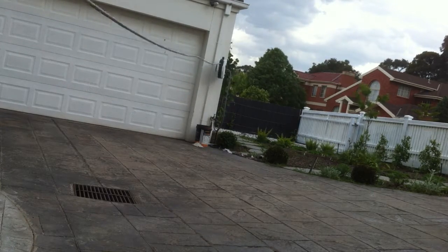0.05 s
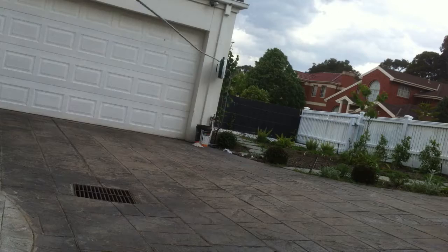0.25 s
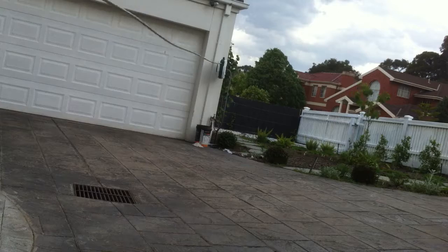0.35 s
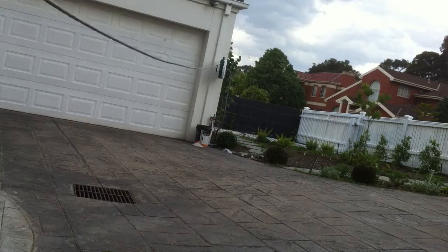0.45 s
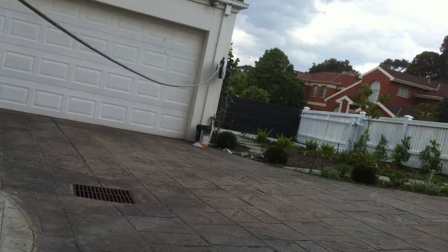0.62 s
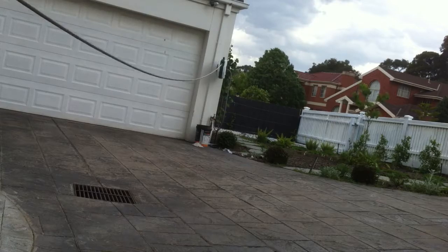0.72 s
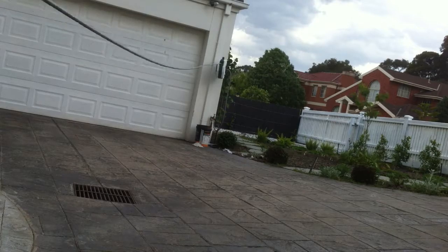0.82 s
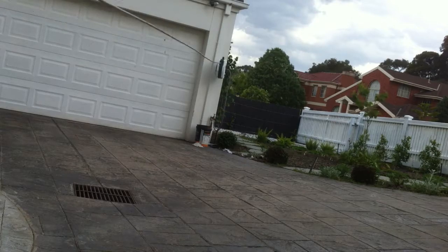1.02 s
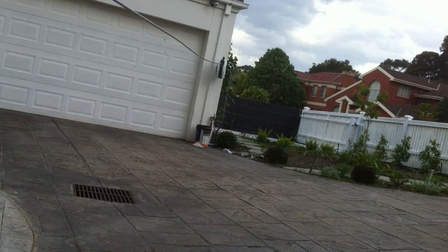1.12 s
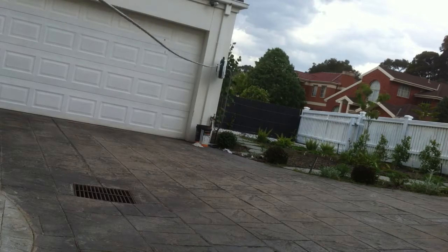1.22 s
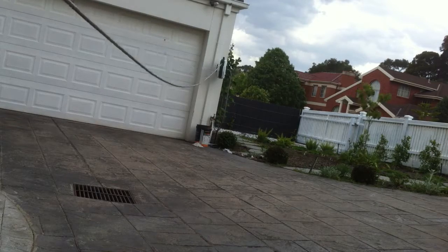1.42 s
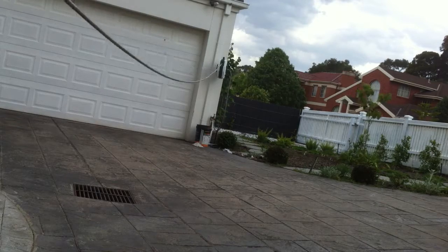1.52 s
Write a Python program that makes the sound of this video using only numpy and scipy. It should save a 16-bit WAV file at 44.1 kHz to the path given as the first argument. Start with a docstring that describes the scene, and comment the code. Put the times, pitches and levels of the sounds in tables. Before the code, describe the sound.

A hose reel clicks six times, unevenly, between about 0.2 and 0.8 seconds, each a sharp plastic snap with a short outdoor echo. Close, dull handling knocks and rubbing on the microphone are loudest from 0.2 to 0.5 seconds, along with a low wind rumble, then thin out by 1.2 seconds. A very faint, distant chirp comes at 1.2 seconds, and a quiet outdoor hush lasts to 1.5 seconds.

```python
"""A suburban driveway by a garage. A hose reel turns slowly and its catch clicks six times: each snap
rings the plastic housing, and a wall slaps it back just as the yard's diffuse tail sets in.
Up close, dull handling knocks set the camera body swinging while the grip rubs.
Underneath sit a little wind rumble and a steady outdoor hush, with one faint far chirp near the end."""
import sys
import numpy as np
from scipy import signal
from scipy.fft import rfft, irfft
from scipy.io import wavfile
from scipy.ndimage import uniform_filter1d

SR = 44100
rng = np.random.default_rng(int(sys.argv[2]) if len(sys.argv) > 2 else 0)


def file_out(sig):
    """Save sig as 16-bit WAV at sys.argv[1]."""
    # one column per channel
    cols = np.atleast_2d(sig).T
    # limit, then scale
    lim = np.clip(cols, -1, 1)
    pcm = np.round(lim * 32767).astype(np.int16)
    wavfile.write(sys.argv[1], SR, pcm)


N = 68355

# fader ride of the wind and handling rumble (time [s], level [dB])
RUMBLE_RIDE = [(0, -47), (.05, -55), (.11, -50.5), (.2, -51), (.3, -38.5), (.42, -41.5), (.49, -29.5),
               (.56, -48.5), (.66, -49.5), (.74, -52.5), (.86, -44.5), (.93, -52.5), (1.08, -54),
               (1.18, -54.5), (1.26, -62), (1.55, -61)]
# tone of that rumble (frequency [Hz], relative level [dB])
RUMBLE_SPECTRUM = [(20, -30), (45, -38.5), (80, -2), (140, 1.5), (240, -2), (400, -20), (700, -25),
                   (1500, -34.5), (16000, -79)]
# tone of the outdoor hush (frequency [Hz], relative level [dB])
HUSH_SPECTRUM = [(30, -7), (60, -20), (120, -12.5), (220, 1), (400, -6), (700, -3.5), (1200, -4),
                 (2000, -11.5), (2900, -16), (4000, -19), (8000, -25.5), (16000, -31)]
# bumps on the camera body, before EQ (time [s], strength [dB], pitch [Hz], decay time [s])
BODY_KNOCKS = [(.003, -27, 140, 0.0032), (.018, -25.5, 145, 0.0081), (0.0315, -23.5, 140, 0.0039),
               (0.1189, -20, 136, 0.0092), (0.1478, -24.5, 134, 0.0089), (.22, -13, 220, .006),
               (.2252, -20, 130, .006), (.2392, -6, 158, .0071), (.2511, -34, 406, .006),
               (.2601, -14.5, 147, .035), (.2719, -36, 429, .007), (.2766, -14, 145, .022),
               (.2948, -1, 211, .0021), (.3075, -34, 195, .05), (.3389, -31, 432, .0038),
               (.3396, -20, 191, .0143), (.3558, -13, 275, .0036), (.3849, -34, 245, .045),
               (.4217, -10, 189, .0049), (.4295, -28, 364, .006), (.4362, -9, 153, .0079),
               (.4425, -30, 620, .0033), (.4664, -21, 470, .008), (.4677, -13, 182, .0157),
               (.4738, -9.5, 230, .0085), (.4803, -15, 455, .008), (.4882, -15, 330, .0045),
               (.4896, -11, 520, .0021), (.5115, -19, 133, .017), (.606, -23.5, 136, 0.014),
               (.6214, -29.5, 269, 0.0071), (0.6696, -21, 143, 0.0086), (0.7724, -37.5, 244, 0.0072),
               (0.8009, -20, 191, 0.011), (0.841, -27.5, 147, .016), (1.0175, -35, 159, 0.014),
               (1.1585, -32.5, 109, 0.02), (1.198, -37, 161, 0.006)]
# tone of the rubbing grip (frequency [Hz], relative level [dB])
RUB_SPECTRUM = [(20, -56), (80, -18), (160, 2), (300, 5), (450, -5), (650, -18), (900, -25.5), (1500, -37),
                (16000, -75.5)]
# clicks of the reel's catch (time [s], gain [dB], housing pitch [ratio], extra ring [Hz],
# presence [dB], treble [dB], top [dB], scrape gain [dB])
CATCH_CLICKS = [(0.1667, -30.5, 1.06, 1868, -3, -0.5, -2, -24), (.2890, -39, 1.0, 2360, 2.5, 3, -2, -28),
                (.3220, -31.5, .92, 1210, -5.5, -3.5, 2.5, -16),
                (0.5952, -33.5, 0.99, 2630, 2.5, 2.5, 8, -26),
                (0.6919, -29.5, .99, 1934, -2, -0.5, -2.5, -27),
                (0.8072, -30.5, 1.01, 3308, 0.5, -0.5, -2.5, -27)]
# the catch lands and rebounds (delay [s], strength [dB])
CATCH_LANDINGS = [(0, 10), (.0009, 7)]
# EQ of the snap (frequency [Hz], gain [dB])
SNAP_EQ = [(200, -43), (700, -18), (1200, 2), (3300, 3), (4100, -8), (5200, -6), (7600, -6), (10000, -12),
           (13000, -16.5), (16000, -18)]
# ring of the plastic housing (frequency [Hz], level [dB], T60 [s])
HOUSING_MODES = [(1216, -9.5, 0.035), (1483, -8.5, 0.036), (2034, -15, 0.022), (2260, -15.5, 0.072),
                 (2713, -13, 0.027), (3294, -10.5, 0.013), (4994, -13.5, 0.014), (6320, -18, 0.014),
                 (7460, -17, 0.012)]
# EQ of the scrape after each snap (frequency [Hz], gain [dB])
SCRAPE_EQ = [(300, -19), (1300, 7), (2500, -18), (3800, -4), (5200, 3), (8000, -13), (10500, -7.5),
             (16000, -23.5)]
# slap off the wall (delay [s], gain [dB])
WALL_ECHOES = [(.0108, -4.5)]
# reverb time of the yard (frequency [Hz], T60 [s])
YARD_DECAY = [(500, 1), (1300, 0.47), (2500, 0.56), (5000, 0.3), (9000, 0.61), (16000, 0.27)]


def amp(db):
    """Decibels to gain."""
    return 10 ** (np.asarray(db) / 20)


def curve_at(points, hz):
    """Reads a curve on a log-frequency axis."""
    point_hz, value = np.transpose(points)
    return np.interp(np.log(hz + 1), np.log(point_hz), value)


def add(mix, start_s, sound):
    """Drops a sound into the mix at its cue."""
    part = mix[max(round(start_s * SR), 0):][:len(sound)]
    part += sound[:len(part)]


def noise(spectrum):
    """A bed of shaped noise at unit RMS."""
    gain = amp(curve_at(spectrum, np.fft.rfftfreq(N, 1 / SR)))
    bed = irfft(rfft(rng.standard_normal(N)) * gain, N)
    return bed / bed.std()


def equalise(x, eq):
    """Minimum-phase EQ, so nothing rings ahead of an attack."""
    log_gain = np.log(amp(curve_at(eq, abs(np.fft.fftfreq(2048, 1 / SR)))))
    taps = np.fft.ifft(np.exp(np.conj(signal.hilbert(log_gain)))).real
    return signal.fftconvolve(x, taps)[:len(x)]


def lowpass(x, hz, order):
    """Rolls off the treble."""
    return signal.sosfilt(signal.butter(order, hz, fs=SR, output="sos"), x)


def air(hush_db=-58.5):
    """Wind and handling rumble unevenly at the microphone over a steady outdoor hush."""
    rumble_db = np.interp(np.arange(N) / SR, *np.transpose(RUMBLE_RIDE))
    return amp(rumble_db) * noise(RUMBLE_SPECTRUM) + amp(hush_db) * noise(HUSH_SPECTRUM)


def handling_knocks(rise_cycles=.41, settle_s=.0132, low_cut_hz=148, high_cut_hz=920, rub_db=-14.5):
    """Each bump sets the camera body swinging for a few cycles; the grip rubs as it moves."""
    bumps, t = np.zeros(N), np.arange(SR // 4) / SR
    for start_s, db, hz, decay_s in BODY_KNOCKS:
        cycles = hz * (t + .123 * settle_s * (1 - np.exp(-t / settle_s)))  # starts sharp, then settles
        attack = 1 - np.exp(-(t * hz / rise_cycles) ** 2)
        add(bumps, start_s, amp(db) * attack * np.exp(-t / decay_s) * np.sin(2 * np.pi * cycles))
    hz = np.fft.rfftfreq(2 * N, 1 / SR) + 1
    band = 1 / (1 + (low_cut_hz / hz) ** 4) / (1 + (hz / high_cut_hz) ** 10)
    thuds = irfft(rfft(bumps, 2 * N) * band)[:N]
    motion = np.sqrt(abs(uniform_filter1d(thuds ** 2, round(.0045 * SR))))  # envelope follower
    return thuds + amp(rub_db) * motion * noise(RUB_SPECTRUM)


def housing_ring(t, pitch, extra_hz, detune=.025):
    """The struck plastic rings in short modes, retuned for each click, with one extra ring on top."""
    modes = [(hz * pitch * (1 + detune * rng.uniform(-.93, 1)), db, t60)
             for hz, db, t60 in HOUSING_MODES]
    modes.append((extra_hz, -13.5, .054))
    return sum(amp(db - 60 * np.maximum(t, 0) / t60) * np.sin(2 * np.pi * (hz * t + rng.random()))
               for hz, db, t60 in modes)


def catch_clicks(slide_s=.00065, snap_s=.0017, rattle_s=.005, scrape_s=.034, grain_db=6.5):
    """The catch slides off a tooth, snaps down, rings the housing and scrapes on; yields each click."""
    lead_s = (SR // 250) / SR  # room for the slide before the snap
    t = np.arange(SR // 4) / SR - lead_s
    after = np.maximum(t, 0)
    slide = np.exp(np.minimum(t, 0) / slide_s)
    burst = amp(-1) * np.exp(-after / snap_s) + amp(-7) * np.exp(-after / rattle_s)
    for start_s, db, pitch, extra_hz, presence_db, treble_db, top_db, scrape_db in CATCH_CLICKS:
        force = slide * burst * rng.standard_normal(len(t))
        for delay_s, landing_db in CATCH_LANDINGS:
            add(force, lead_s + delay_s, amp([landing_db]))
        snap = equalise(force, SNAP_EQ)
        ring = slide * housing_ring(t, pitch, extra_hz)
        grit = rng.standard_normal(len(t)) * amp(grain_db * rng.standard_normal(len(t)))
        scrape = amp(scrape_db) * equalise(slide * np.exp(-after / scrape_s) * grit, SCRAPE_EQ)
        tone = [(1520, 0), (3040, presence_db), (7400, treble_db), (14000, top_db)]
        click = np.zeros(N)
        add(click, start_s - lead_s, amp(db) * equalise(snap + ring + scrape, tone))
        yield click


def wall_slap(click, scatter_s=.0025, scatter_db=-5):
    """The panelled wall throws the click back, roughened by a short scatter."""
    slap, t = np.zeros(N), np.arange(SR // 50) / SR
    scatter = rng.standard_normal(len(t)) * np.exp(-t / scatter_s)
    rough = signal.fftconvolve(click, scatter / np.linalg.norm(scatter))[:N]
    for delay_s, db in WALL_ECHOES:
        add(slap, delay_s, amp(db) * (click + amp(scatter_db) * rough))
    return slap


def yard_tail(click, predelay_s=.008, send_db=-2.5, blur_hz=352, high_cut_hz=4230):
    """The yard answers with a diffuse, darker tail that keeps the click's broad colour."""
    hz, t, bands = signal.stft(rng.standard_normal(SR), SR, nperseg=256)
    wash = signal.istft(bands * amp(-60 * t / curve_at(YARD_DECAY, hz)[:, None]), SR)[1]
    colour = np.sqrt(abs(uniform_filter1d(abs(rfft(click)) ** 2, round(blur_hz * N / SR))))
    wet = irfft(rfft(wash / np.linalg.norm(wash), N) * colour, N)[:SR]
    tail, peak_s = np.zeros(N), np.argmax(abs(click)) / SR
    add(tail, peak_s + predelay_s, amp(send_db) * lowpass(wet, high_cut_hz, order=1))
    return tail


def far_chirp(start_s=1.21, length_s=.04, start_hz=2660, rise_hz=200, gain_db=-61.5):
    """A faint, rough rising note far away, perhaps a bird."""
    chirp, progress = np.zeros(N), np.linspace(0, 1, round(length_s * SR))
    flutter = lowpass(rng.standard_normal(len(progress)), hz=110, order=2)
    note = np.sin(2 * np.pi * np.cumsum(start_hz + rise_hz * progress) / SR)
    add(chirp, start_s, amp(gain_db) * np.sin(np.pi * progress) * flutter / flutter.std() * note)
    return chirp


def scene():
    """Mono mix: the reel with its slap and tail, the chirp behind, knocks and air up front."""
    reel = sum(click + wall_slap(click) + yard_tail(click) for click in catch_clicks())
    return (reel + far_chirp() + handling_knocks() + air())[None]


def record(dry):
    """A steep high cut at 16 kHz on the whole mix."""
    high_cut = signal.firwin(511, 16000, window=("kaiser", 9), fs=SR)
    return signal.oaconvolve(dry, high_cut[None], "same")


dry = scene()
out = record(dry)
file_out(out)
```